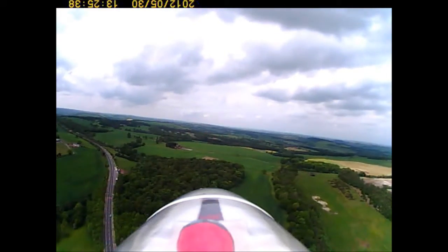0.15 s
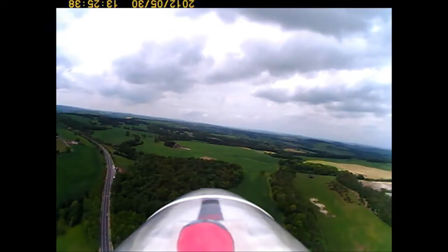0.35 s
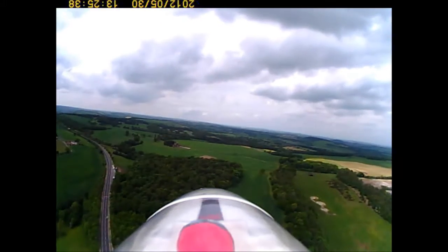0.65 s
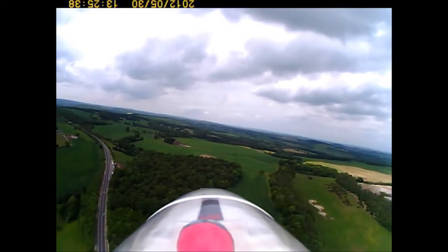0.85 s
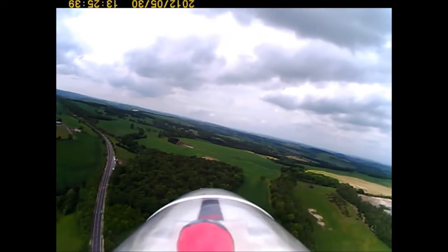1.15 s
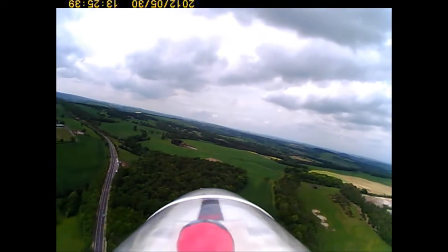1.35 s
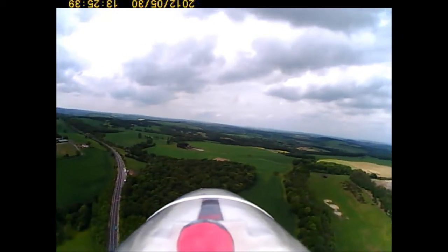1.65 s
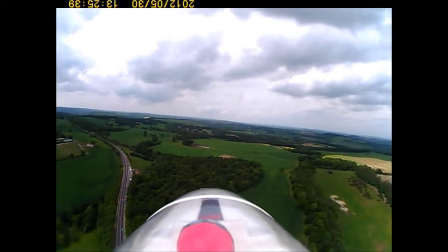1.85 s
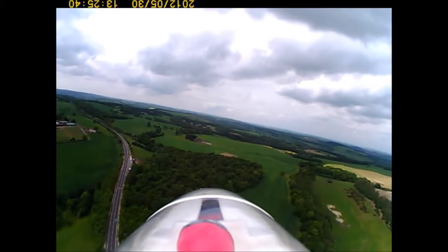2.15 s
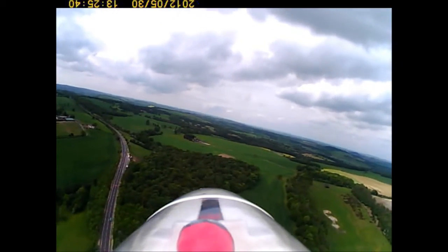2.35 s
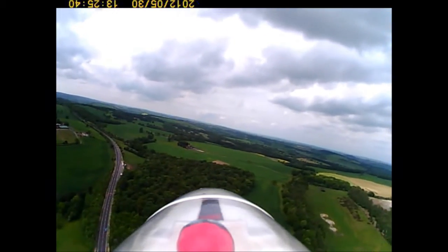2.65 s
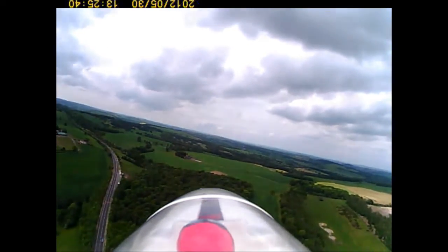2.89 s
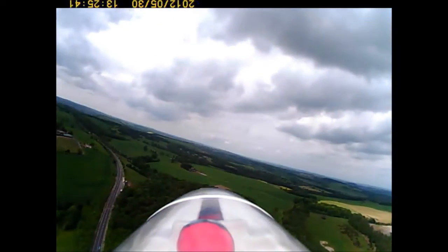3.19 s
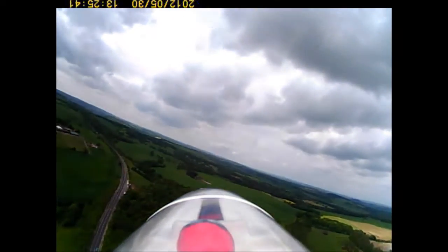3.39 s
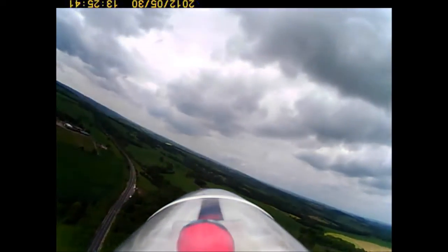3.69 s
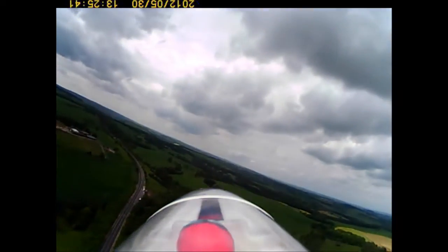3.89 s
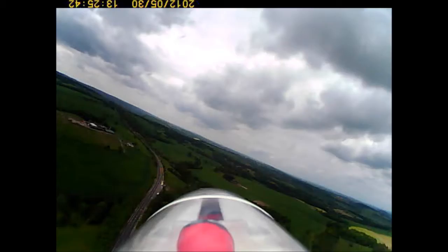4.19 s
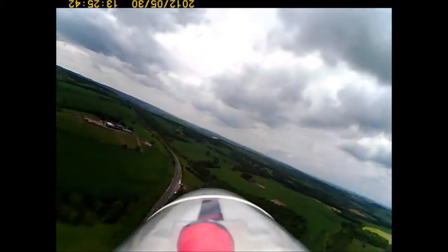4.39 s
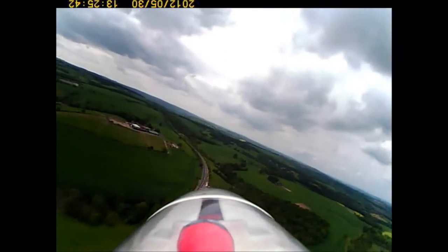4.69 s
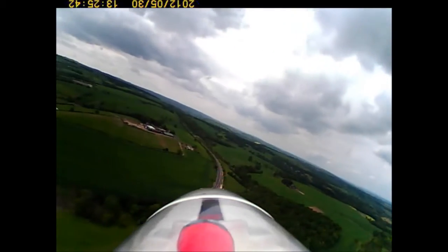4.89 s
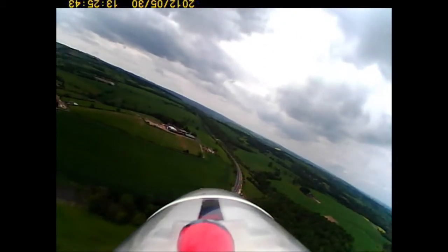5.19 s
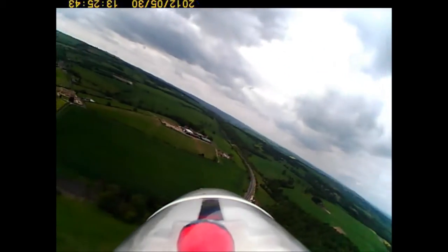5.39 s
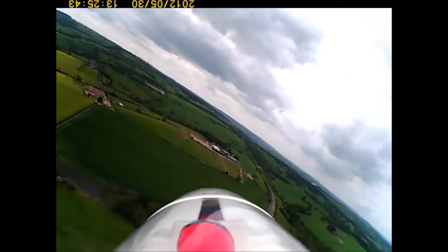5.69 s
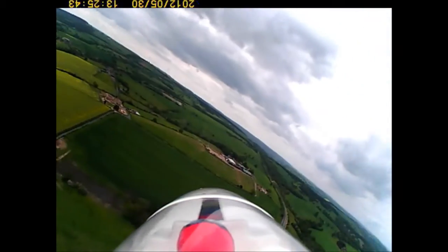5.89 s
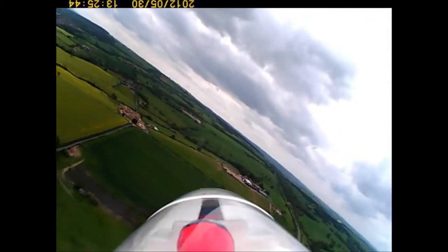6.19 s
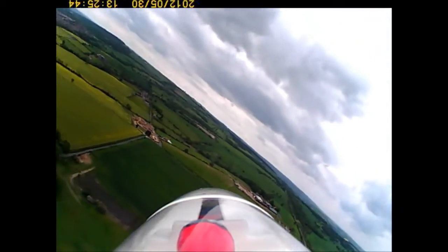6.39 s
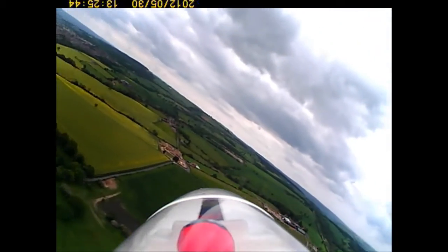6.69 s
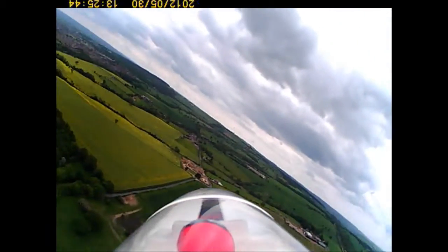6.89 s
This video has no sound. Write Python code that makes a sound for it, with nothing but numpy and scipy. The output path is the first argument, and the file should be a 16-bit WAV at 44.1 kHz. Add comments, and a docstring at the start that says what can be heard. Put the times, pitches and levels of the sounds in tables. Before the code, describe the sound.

Strong wind roars over a camera on a banking glider, lumpy and low at first, then smoother and brighter, with tiny ticks and a passing hollow whistle.

```python
"""On the back of a powered glider banking into a turn, air rushes over the housing of a small camera.
One airflow drives buffeting, a rush coloured by resonant hollows, a deep rumble and a sputtering fizz:
each is noise shaped in frequency and then in level. Gliding sinusoids make edge whistles and a faint high
whine, narrow-band noise makes an airy whistle, and decaying sinusoids make dry ticks.
A steady hiss lies beneath; the recorder flattens the highest wave tops and limits the band."""
import sys
import numpy as np
from scipy import signal
from scipy.fft import rfft, irfft
from scipy.io import wavfile

SR = 44100
rng = np.random.default_rng(int(sys.argv[2]) if len(sys.argv) > 2 else 0)


def int16_out(signal):
    """Quantize to a 16-bit WAV file."""
    q = np.round(np.clip(np.atleast_2d(signal).T, -1, 1) * 32767)
    wavfile.write(sys.argv[1], SR, q.astype(np.int16))


N = 310903
TIME = np.arange(N) / SR  # seconds

# Strength of the airflow about its usual level, with two lulls; each wind layer scales it by its own swing.
# Columns: time_s, flow_db
FLOW = [(0.0, -2), (0.22, 1.1), (0.38, -1), (0.78, 3), (1.42, 0.36), (1.76, -6.0), (2.28, -2.5),
        (2.52, 2.9), (3.2, 2.5), (3.98, -4.7), (4.4, -0.74), (5.16, -1.3), (5.28, 1), (5.94, 3),
        (6.1, -0.5), (6.48, 3), (6.92, 1), (7.04, 5)]
# Extra drive of the low buffeting, strong until the turn begins; each layer scales it.
# Columns: time_s, drive_db
BUFFETING = [(0.0, 5), (1.2, 0.5), (1.6, 7), (1.8, 1.4), (2.3, 6), (2.46, -2), (3.96, -2), (5.18, -1.25),
             (7.04, -1.5)]


def gain_of(db):
    """Logarithmic level: 20 dB is a factor of ten in amplitude."""
    return 10 ** (np.asarray(db) / 20)


def evened(x):
    """Normalisation: the mean square is brought to one, so rms is 1."""
    return x / np.sqrt(np.mean(x ** 2) + 1e-20)


def read(points, hz):
    """Spectral interpolation: straight lines between points on a log-frequency axis."""
    point_hz, value = np.transpose(points)
    return np.interp(np.log(hz + 1), np.log(point_hz + 1), value)


def follow(rows, t):
    """Linear interpolation of a time curve at the times t."""
    return np.interp(t, *np.transpose(rows))


def wander(rate_hz):
    """Low-pass random process: Gaussian filtering leaves smooth motion of rms 1 up to about rate_hz."""
    hz = np.fft.rfftfreq(N, 1 / SR)
    spectrum = rfft(rng.standard_normal(N))
    return evened(irfft(spectrum * np.exp(-(hz / rate_hz) ** 2), N))


def turbulence(colour_db, size=2048):
    """Time-varying filtering: white noise takes the spectrum colour_db(hz, s), at rms 1."""
    overlap = size - size // 4
    hz, t, frames = signal.stft(rng.standard_normal(N), SR, nperseg=size, noverlap=overlap)
    shaped = frames * gain_of(colour_db(hz[:, None], t[None]))
    return evened(signal.istft(shaped, SR, nperseg=size, noverlap=overlap)[1][:N])


def brightness(t, db_per_flow_db=0.22):
    """Eddy scaling: faster air sheds smaller eddies, lifting the treble (dB) at the times t."""
    # Extra lift of the treble, rising in the steep bank. Columns: time_s, lift_db
    treble = [(0, -2.3), (1.9, -0.5), (2.7, 0.9), (3.4, -0.5), (4.2, -0.1), (5.8, 0.6), (6.7, 4),
              (7.05, 3.5)]
    return db_per_flow_db * follow(FLOW, t) + follow(treble, t)


def buffet(level_db=-16.5, swing=.95, extra_swing=1.52, lumpy_db=0.7, octaves_per_db=0.0442):
    """Pressure fluctuation: mid-sized eddies beat on the microphone, louder and higher with the airflow."""
    # Spectrum of the eddies that hit the microphone. Columns: frequency_hz, relative_density_db (per Hz)
    eddies = [(20, -24), (100, -9), (200, -2), (350, 1.5), (520, 0), (700, -4), (900, -12.5), (1400, -30.5),
              (2500, -35.5), (5000, -50)]

    def colour_db(hz, t):
        shift = 2 ** (octaves_per_db * follow(FLOW, t))
        return read(eddies, hz / shift)

    drive_db = swing * follow(FLOW, TIME) + extra_swing * follow(BUFFETING, TIME)
    return gain_of(level_db + drive_db + lumpy_db * wander(16)) * turbulence(colour_db)


def rush(level_db=-16.0, swing=0.86, tilt=1.0, flutter_db=0.77, treble_flutter_db=0.66):
    """Cavity resonance: hollows colour the air sliding past, brighter with speed; the treble flutters."""
    # Spectrum of air sliding past the housing. Columns: frequency_hz, relative_density_db (per Hz)
    sliding_air = [(60, -12), (300, -4.5), (600, -1.5), (850, -1.5), (1250, -1), (1600, -7), (2050, -10.5),
                   (2400, -21), (3100, -24), (3500, -35.5), (5000, -40), (7800, -41.5)]
    # Resonant hollows of the housing. Columns: centre_hz, width_hz, boost_db
    hollows = [(997, 300, 3.5), (2020, 360, 2), (2844, 380, 6), (4200, 450, 3)]
    flutter = wander(25)

    def colour_db(hz, t):
        # how far each frequency takes part in the lift; the upper hollows gain most
        share = read([(1100, 0.039), (2000, 1.18), (2850, 1.7), (4500, 1.3)], hz)
        hollows_db = sum(db / (1 + (2 * (hz - centre) / width) ** 2) for centre, width, db in hollows)
        lift_db = tilt * brightness(t) + treble_flutter_db * np.interp(t, TIME, flutter)
        return read(sliding_air, hz) + hollows_db + share * lift_db

    drive_db = swing * follow(FLOW, TIME) + flutter_db * wander(51)
    return gain_of(level_db + drive_db) * turbulence(colour_db)


def rumble(level_db=-19.6, swing=.38, deep_swing=.7, buffeting_swing=.75, lumpy_db=1.5, deep_lumpy_db=2):
    """Eddy scaling: large eddies vary slowly; the deepest swell in lumps and with airflow and buffeting."""
    # Spectrum of air pressing on the microphone. Columns: frequency_hz, relative_density_db (per Hz)
    pressing_air = [(10, -9.5), (30, -16), (60, -6), (110, -2.5), (180, 0.5), (260, -2.5), (400, -8.5),
                    (800, -24.5), (3000, -50.5)]
    lumps = wander(5)

    def colour_db(hz, t):
        depth = read([(40, 1), (150, 0.15)], hz)  # the deepest frequencies move most
        press_db = deep_swing * follow(FLOW, t) + buffeting_swing * follow(BUFFETING, t)
        lumps_db = deep_lumpy_db * np.interp(t, TIME, lumps)
        return read(pressing_air, hz) + depth * (press_db + lumps_db)

    drive_db = swing * follow(FLOW, TIME) + lumpy_db * wander(6)
    return gain_of(level_db + drive_db) * turbulence(colour_db)


def fizz(level_db=-45.5, swing=1.1, tilt=.4, sputter_db=6):
    """Intermittency: the smallest eddies arrive in short spurts, a sputtering hiss on top of the rush."""
    drive_db = swing * follow(FLOW, TIME) + tilt * brightness(TIME)
    sputter = evened(0.29 * wander(60) + wander(900))
    spurts = evened(gain_of(sputter_db * sputter))
    # columns: frequency_hz, relative_density_db (per Hz)
    colour = [(1500, -11.5), (3200, 3), (5000, 2.0), (8000, 3.5), (10000, -42.0)]
    return gain_of(level_db + drive_db) * spurts * turbulence(lambda hz, t: read(colour, hz))


def edge_tone(s, lowest_hz, db, unsteady_hz=20, jitter_hz=2, flutter_db=1):
    """Edge-tone tuning: a whistle glides down and up, loudest at the bottom, shaken by turbulence."""
    glide_hz_per_s, turn_s, fade_db_per_hz = 84, .11, .4
    # a hyperbola: rounded at the bottom, nearly straight glides on both sides
    sharp_hz = glide_hz_per_s * (np.hypot(TIME - s, turn_s) - turn_s)
    turns = np.cumsum(lowest_hz + sharp_hz + jitter_hz * wander(unsteady_hz)) / SR
    strength = gain_of(db - fade_db_per_hz * sharp_hz + flutter_db * wander(unsteady_hz))
    return strength * np.sqrt(2) * np.sin(2 * np.pi * turns)


def edge_tones():
    """Superposition: the separate low edge whistles add."""
    # Edge tones that sag into tune and out again. Columns: loudest_s, lowest_pitch_hz, level_db
    sagging_tones = [(5.26, 534.5, -18.5), (7.05, 528, -24)]
    return sum(edge_tone(*row) for row in sagging_tones)


def airy_whistle(peak_s=1.83, centre_hz=3200, level_db=-42, width_hz=380):
    """Band-limited noise: a narrow band of hiss sings briefly in the first lull."""
    rise_db_per_s, fall_db_per_s = 160, 50
    envelope_db = np.minimum(rise_db_per_s * (TIME - peak_s), fall_db_per_s * (peak_s - TIME))
    band = turbulence(lambda hz, t: -20 * np.log10(1 + (2 * (hz - centre_hz) / width_hz) ** 2))
    return gain_of(level_db + envelope_db) * band


def whine(pitch_hz=7757, level_db=-63.5, swing=.5, waver_db=2):
    """Frequency and amplitude modulation: a faint thin tone wavers and follows the airflow."""
    turns = np.cumsum(pitch_hz + 4 * wander(25)) / SR
    strength = gain_of(level_db + swing * follow(FLOW, TIME) + waver_db * wander(3))
    return strength * np.sqrt(2) * np.sin(2 * np.pi * turns)


def ticks(trim_db=2, ring_hz=4500, decay_s=0.00015):
    """Damped oscillation: tiny dry knocks on the housing die away within a millisecond."""
    # Sharp ticks on the housing; level is before trim and decay. Columns: start_s, level_db
    knocks = [(3.0038, -14), (5.326, -8), (6.7, -17.5), (7.0252, -20.5)]
    out = np.zeros(N)
    for start_s, db in knocks:
        age = np.maximum(TIME - start_s, 0)
        out += gain_of(db + trim_db) * np.exp(-age / decay_s) * np.sin(2 * np.pi * ring_hz * age)
    return out


def hiss(level_db=-49.5):
    """White noise: equal power in every hertz, at a steady level."""
    return gain_of(level_db) * rng.standard_normal(N)


def scene():
    """Superposition: the pressures of wind, whistles and small noises add at one microphone."""
    wind = buffet() + rush() + rumble() + fizz()
    whistles = edge_tones() + airy_whistle() + whine()
    return (wind + whistles + ticks() + hiss())[None]


def record(dry, recorder_hz=16000, full_scale=.5, edge_hz=7750):
    """Clipping and band limiting: flattened wave tops add a fine crackle, then a low-pass cuts the top."""
    sampled = signal.resample(dry, round(N * recorder_hz / SR), axis=1)
    flattened = np.clip(sampled, -full_scale, full_scale)
    restored = signal.resample(flattened, N, axis=1)
    low_pass = signal.firwin(221, edge_hz, window=("kaiser", 8), fs=SR)
    return signal.oaconvolve(restored, low_pass[None], "same")


dry = scene()
out = record(dry)
int16_out(out)
```